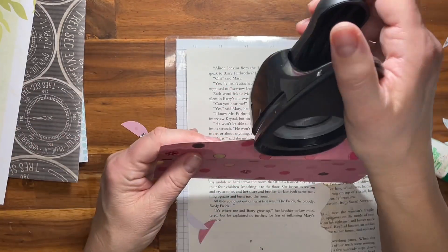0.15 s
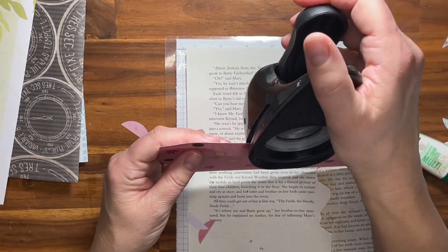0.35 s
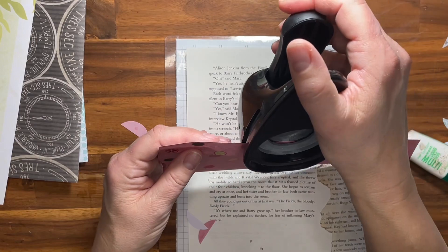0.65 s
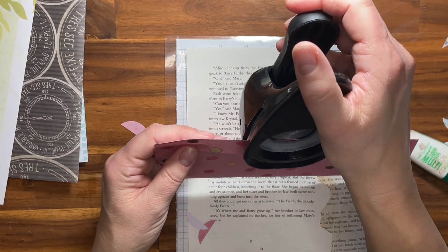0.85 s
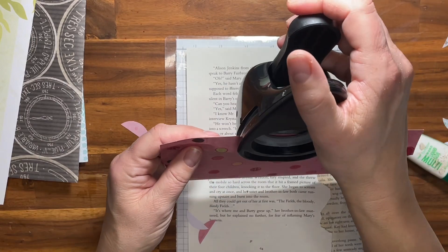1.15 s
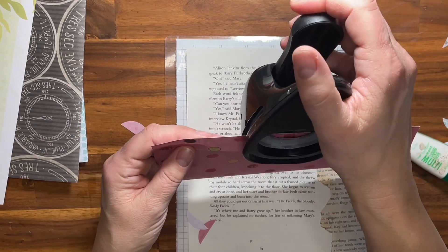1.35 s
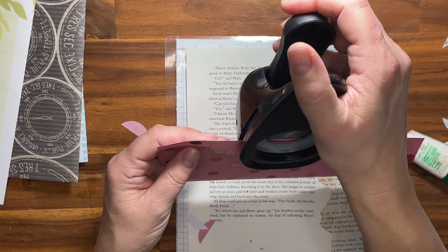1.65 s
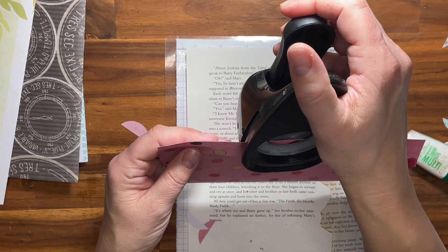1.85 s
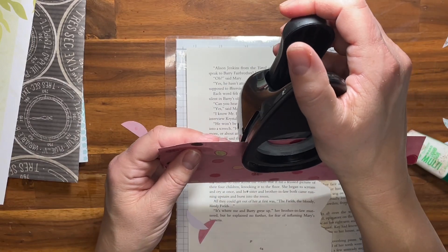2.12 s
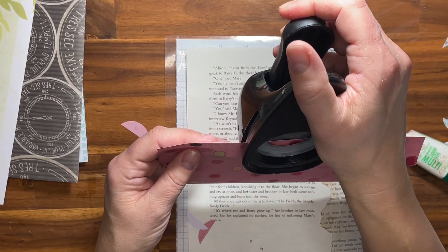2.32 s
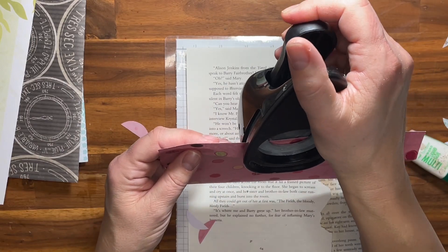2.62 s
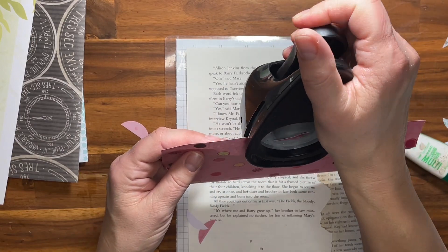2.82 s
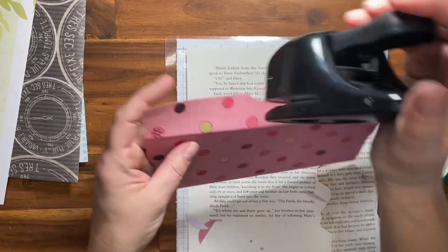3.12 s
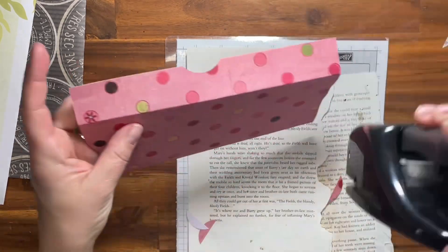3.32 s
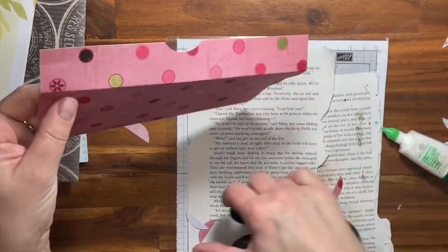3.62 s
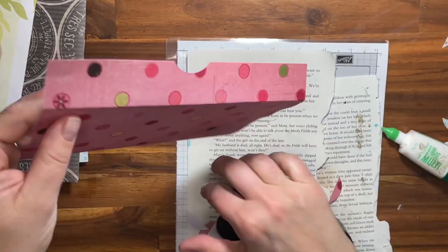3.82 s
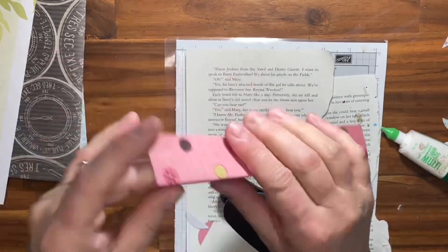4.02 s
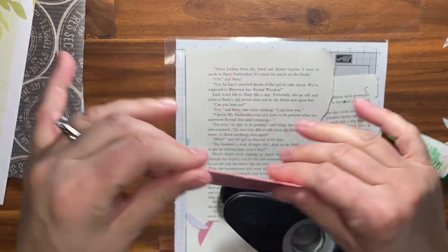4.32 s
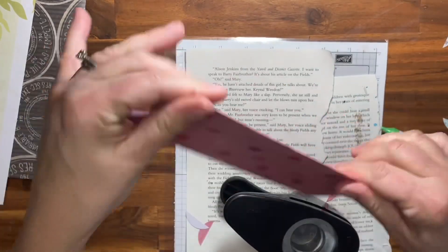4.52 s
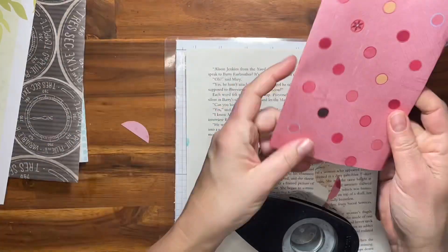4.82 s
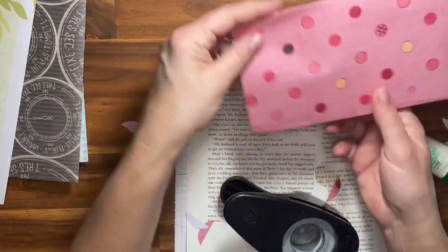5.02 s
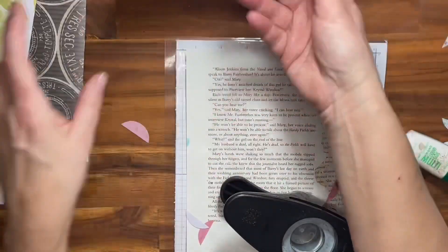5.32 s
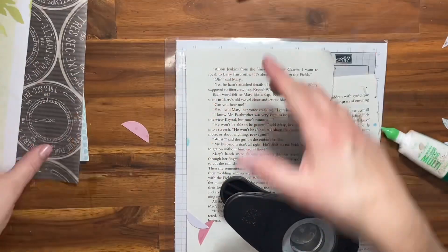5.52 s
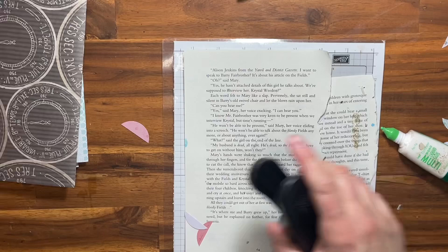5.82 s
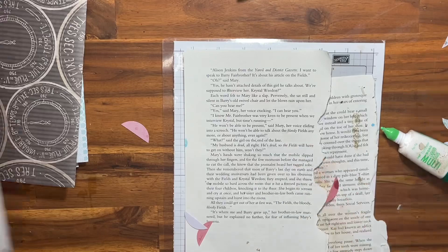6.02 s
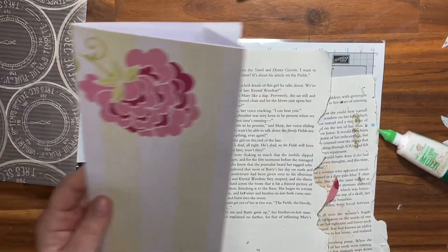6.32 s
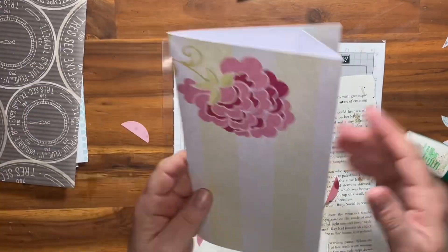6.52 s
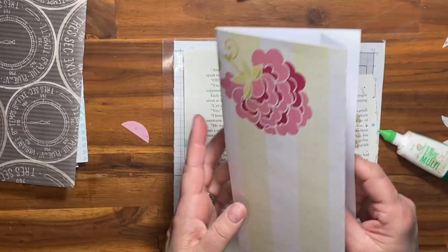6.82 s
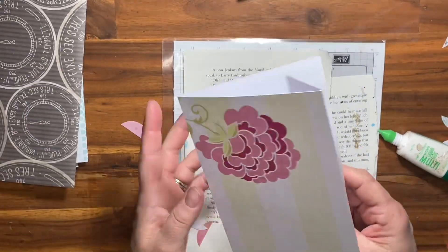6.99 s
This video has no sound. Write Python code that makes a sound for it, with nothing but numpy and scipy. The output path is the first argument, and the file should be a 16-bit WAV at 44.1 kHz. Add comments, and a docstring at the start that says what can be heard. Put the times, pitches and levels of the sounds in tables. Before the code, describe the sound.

Close up in a small room with a faint low ventilation rumble, card rubs faintly in the fingers. A plastic lever punch crunches through it with a dry crackle and clicks back, then lands on the wooden table in two loud hollow clacks. Brisk card rustles and snaps follow, one sharp, then a short grating shove and several woody bumps.

```python
"""In a small room with a low ventilation rumble, someone crafts at a wooden table.
Card slides through the fingers, as rough friction noise; soft contacts and snaps are short resonant bursts.
A plastic lever punch shears a notch out of a card, springs open and is set down with two hard knocks,
rung by the damped modes of its parts and of the table top. Then card is tapped and laid aside, the punch
is shoved, and hands and card bump the table. Two close ports hear it with unequal phase and level."""
import sys
import numpy as np
from scipy import signal
from scipy.fft import rfft, irfft, next_fast_len
from scipy.io import wavfile
from scipy.ndimage import uniform_filter1d, map_coordinates

SR = 44100
rng = np.random.default_rng(int(sys.argv[2]) if len(sys.argv) > 2 else 0)


def generate_wav(signal):
    """Clip the signal to [-1, 1] and save it as 16-bit WAV at the path in sys.argv[1]."""
    frames = np.transpose(np.atleast_2d(signal))
    scaled = np.clip(frames, -1, 1) * 32767
    pcm = np.round(scaled).astype(np.int16)
    wavfile.write(sys.argv[1], SR, pcm)


N = 315315

# the punch lands twice, rocking on its base: (time [s], clack level [dB], weight [dB],
# brightness [dB per octave], frequency at which the struck corner rings most [Hz])
PUNCH_LANDINGS = [(3.645, -7.5, -7.5, 1, 4150), (3.672, -21.5, -15.5, -1, 2200),
                  (3.8318, -20.5, -29, -2.5, 1550), (3.8505, -11.5, -7.5, 3, 5300),
                  (3.865, -15.5, -16.5, 1.5, 3200), (3.902, -23.5, -30, -3.5, 1610),
                  (3.910, -28, -29, 3, 1140), (3.921, -39, -21, -3, 1140)]
# modes of the punch's hollow body: (frequency [Hz], relative level [dB], t60 [s])
BODY_MODES = [(397, -3.5, 0.089), (440, 2, 0.04), (482, -3, .06), (555, -7, .06), (638, -3.5, 0.051),
              (703, -8, .05), (794, -5, .055), (886, -8, .03)]
# modes of the punch's steel die: (frequency [Hz], relative level [dB], t60 [s])
DIE_MODES = [(1110, -4, .3), (1120, -4, .4), (1146, -0.5, 0.48), (1183, 5, .14)]


def amp(db):
    """Level in decibels to amplitude ratio."""
    return 10 ** (np.asarray(db) / 20)


def unit(x):
    """Normalisation to an rms of 1."""
    return x / np.sqrt(np.mean(x ** 2) + 1e-20)


def along(points, hz):
    """Interpolation of (frequency [Hz], value) points on a logarithmic frequency axis."""
    f, v = np.transpose(points)
    return np.interp(np.log(hz + 1), np.log(f + 1), v)


def filtered(x, response):
    """Linear filtering: the spectrum of x times a response of frequency."""
    size = x.shape[-1]
    padded = next_fast_len(size + SR // 4)
    spectrum = rfft(x, padded) * response(np.fft.rfftfreq(padded, 1 / SR))
    return irfft(spectrum, padded)[..., :size]


def coloured(x, spectrum):
    """Spectral shaping of x, renormalised to an rms of 1."""
    return unit(filtered(x, lambda hz: amp(along(spectrum, hz))))


def wobble(rate):
    """Slow random modulation: a smooth curve through random knots, rate of them a second."""
    knots = rng.standard_normal(int(N * rate / SR) + 4)
    return map_coordinates(knots, [np.arange(N) * rate / SR])


def ring_time():
    """Time axis of the half second that follows a contact."""
    return np.arange(SR // 2) / SR


def fade(t60, attack):
    """Exponential decay of a damped system after a quick rise."""
    t = ring_time()
    return np.exp(-np.log(1000) * t / t60) * (1 - np.exp(-t / attack))


def ring(modes, attack, scatter_db):
    """Modal superposition: damped sines, each at a new random strength for every blow."""
    sound = np.zeros(SR // 2)
    for hz, db, t60 in modes:
        strength = amp(db + scatter_db * rng.standard_normal())
        sound += strength * fade(t60, attack) * np.sin(2 * np.pi * hz * ring_time())
    return sound


def burst(hz, t60, q, attack):
    """Resonance excited by a brief noisy force: a crunch heard through a broad band around one pitch."""
    force = fade(t60, attack) * (1 - np.exp(-ring_time() / attack))
    noise = force * rng.standard_normal(len(force))
    sound = filtered(noise, lambda f: 1 / (1 + 1j * q * (f / hz - hz / (f + 1))) ** 2)
    return sound * np.linalg.norm(force) / np.linalg.norm(sound)


def add(track, s, sound):
    """Superposition: mix a sound into the track at time s."""
    start = round(s * SR)
    track[start:start + len(sound)] += sound[:N - start]


def ventilation(rumble_db=-47.5, diffuse_db=-72):
    """Steady broadband noise: a coherent rumble at both ports under a little incoherent, diffuse air."""
    # rumble spectrum: (frequency [Hz], relative level [dB])
    air = [(20, -7.5), (35, -15), (54, 5.5), (80, -5.5), (100, -13), (120, 0), (145, -12), (175, -11),
           (280, -20.5), (420, -21), (1000, -27), (2500, -31.5), (6000, -47.5), (16000, -88)]
    air_above = [(100, -3), (500, 4), (2500, -7.0), (7000, -97), (16000, -50.0)]
    diffuse = np.array([coloured(rng.standard_normal(N), air_above) for _ in range(2)])
    return amp(rumble_db) * coloured(rng.standard_normal(N), air) + amp(diffuse_db) * diffuse


def room(x, early_db, tail_db, early_t60=0.027, apart_db=-2):
    """Reverberation: early reflections from close surfaces, then a partly incoherent tail at the ports."""
    # reverberation time: (frequency [Hz], t60 [s])
    decay_times = [(60, 1), (300, 0.44), (1200, 0.47), (4000, 0.36), (12000, 0.25)]
    hz, t, z = signal.stft(rng.standard_normal((3, SR // 2)), SR, nperseg=256)
    decay = np.exp(-np.log(1000) * t / along(decay_times, hz)[:, None])
    tails = signal.istft(z * decay, SR, nperseg=256)[1][:, :SR // 2]
    # one part of the tail is shared, the other differs from port to port
    tails = (tails[0] + amp(apart_db) * tails[1:]) * (1 - np.exp(-ring_time() / 0.0034))
    early = rng.standard_normal(SR // 2) * fade(early_t60, attack=0.0071)
    early = amp(early_db) * early / np.linalg.norm(early)
    answer = early + amp(tail_db) * tails / np.linalg.norm(tails[0])
    return x + signal.fftconvolve(x[None], answer, axes=1)[:, :N]


def sliding(pressure_weight, rise_share=0.34, fall_share=.35, resting_db=-78.5):
    """Sliding speed and pressure set friction strength: strokes speed up, hold and slow down, adding in power."""
    # strokes of card over skin, paper and wood:
    # (time [s], length [s], relative level [dB], pressure [dB], counted by pressure_weight)
    strokes = [(0.145, 0.38, -62, 1.5), (0.478, 0.19, -69.5, 2), (.74, 0.13, -69.5, 0),
               (0.874, 0.58, -68.5, 3), (1.37, 0.25, -72, 2), (2.042, 0.091, -75, 9),
               (2.643, 0.092, -56, 4), (2.66, 0.3, -58, 3.5), (2.846, 0.031, -47.5, 6.5),
               (2.87, 0.21, -61, -2), (2.967, 0.26, -63.5, 7.5), (3.308, 0.63, -72, 0),
               (3.406, 0.15, -60, -6), (3.979, 0.089, -60.5, 16), (3.966, 0.27, -57, 1.5),
               (4.235, 0.21, -50.5, -17.5), (4.488, 0.09, -53, -4.5), (4.589, 0.14, -55, -1),
               (4.675, 0.21, -58, -2), (4.821, 0.36, -55.5, -1), (5.1, 0.22, -70.5, -1),
               (5.225, 0.14, -61.5, -5), (5.347, 0.086, -48.5, 3.5), (5.432, 0.14, -49, 5),
               (5.517, 0.32, -51.5, 4.5), (5.681, 0.029, -44, 0), (5.711, 0.056, -53.5, 12),
               (5.743, 0.49, -57.5, -1.5), (6.126, 0.13, -55, 9.5), (6.18, 0.42, -61.5, 7.5),
               (6.529, 0.2, -55, 4.5), (6.713, 0.12, -55.5, 10.5), (6.78, 0.28, -72.5, 7),
               (6.9, 0.35, -64.5, 8.5)]
    t = np.arange(N) / SR
    power = np.full(N, amp(resting_db) ** 2)  # the card shifting in a still hand
    for s, length, db, pressure_db in strokes:
        u = t[:round(length * SR)] / length
        speed = np.clip(np.minimum(u / rise_share, (1 - u) / fall_share), 0, 1)
        add(power, s, (amp(db + pressure_weight * pressure_db) * speed) ** 2)
    return np.sqrt(power)


def friction(spectrum, catches_per_s, catch_db, patchy_db):
    """Stick-slip of fibres: a rush with tiny uneven catches, its colour shifting as the sheet bends."""
    catches = (rng.random(N) < catches_per_s / SR) * rng.uniform(-1.03, 1, N)
    rush = rng.standard_normal(N) + amp(catch_db) * unit(catches)
    z = signal.stft(rush, nperseg=512)[2]
    # random gains, smoothed over frequency and then over time
    patches = uniform_filter1d(rng.standard_normal(z.shape), size=5, axis=0)
    patches = uniform_filter1d(patches, size=9, axis=1)
    return coloured(signal.istft(z * amp(patchy_db * unit(patches)), nperseg=512)[1][:N], spectrum)


def crackles(per_s=40, centre_hz=2900, octaves=0.83, uneven_db=5.0, t60=0.018, q=1.1):
    """Random impulsive excitation: creases and edges catch, each with its own pitch and size; rms 1."""
    out, size = np.zeros(N), SR // 40
    envelope = fade(t60, attack=0.0013)[:size]
    for when, pitch, chance in rng.random((round(per_s * N / SR), 3)):
        hz = centre_hz * 2 ** (octaves * (2 * pitch - 1))
        resonance = signal.iirpeak(hz, q, fs=SR)
        grain = signal.lfilter(*resonance, envelope * rng.standard_normal(size))
        grain = signal.lfilter(*resonance, grain)
        add(out, when * N / SR, amp(-uneven_db * np.log(chance + 0.04)) * unit(grain))
    return unit(out)


def rustle(scrape_db=-2, hiss_db=0, fizz_db=-5, crackle_db=-8, grip_db=2.0, fizz_loss=0.38):
    """Friction noise under an unsteady grip: pressure brings out scrape and crackle, light strokes the fizz."""
    # spectra of the sheet's scrape, its hiss and its fibres' fizz: (frequency [Hz], relative level [dB])
    scrape_spectrum = [(150, -10), (400, 12.5), (700, 7.5), (1150, 9), (2000, 4), (3300, 7.5), (5000, -11),
                       (8000, -39), (16000, -49)]
    hiss_spectrum = [(1000, -12), (2500, -5), (4000, 1.5), (5500, 5), (7500, -7.5), (10500, -8),
                     (16000, -7.5)]
    fizz_spectrum = [(3000, -46), (6500, -73), (9000, 2.5), (11500, -1), (13500, -13), (16000, -0.5)]
    pressed = sliding(0.92)
    light = sliding(-fizz_loss)  # dB lost for each dB of pressure
    scrape = pressed * friction(scrape_spectrum, catches_per_s=250, catch_db=-2.0, patchy_db=2.5)
    hiss = sliding(0) * friction(hiss_spectrum, catches_per_s=500, catch_db=-16.0, patchy_db=2)
    fizz = light * friction(fizz_spectrum, catches_per_s=200, catch_db=-13.0, patchy_db=1)
    rubbing = amp(scrape_db) * scrape + amp(hiss_db) * hiss + amp(fizz_db) * fizz
    return amp(grip_db * wobble(60)) * rubbing + amp(crackle_db) * pressed * crackles()


def small_contacts(tick_db=4, edge_db=-14, edge_hz=5000, soft_hz=5500, soft_t60=0.058, snap_t60=0.017):
    """Contact hardness sets brightness: soft low contacts, crisp snaps, a spring's ping, a lever's click."""
    # soft low contacts: taps of fingers and card, the falling knock of board bumps,
    # the punch and a hand rubbing the table: (time [s], level [dB], pitch [Hz])
    soft_contacts = [(.818, -45, 836), (0.983, -43.5, 650), (1.145, -48.5, 1180), (1.801, -47.5, 884),
                     (2.698, -44.5, 1700), (2.857, -46, 1070), (2.995, -46, 1880), (3.012, -43.5, 1630),
                     (4.036, -41, 700), (4.253, -42.5, 1160), (4.557, -42, 880), (4.671, -36.5, 790),
                     (4.625, -46.5, 740), (5.035, -47, 875), (5.108, -47, 1110), (5.362, -38, 1430),
                     (5.412, -25, 1400), (5.419, -36, 650), (5.726, -35, 1300), (5.731, -38, 520),
                     (6.197, -34.5, 1100), (6.201, -30.5, 520), (6.325, -25, 1870), (6.333, -34, 850),
                     (6.633, -28.5, 1590), (6.641, -33, 960), (6.741, -32, 900), (6.754, -30.5, 1150),
                     (6.788, -49, 2120), (7.0605, -43.5, 1830)]
    # sharp snaps of card edges, cut fibres and the punch's lever: (time [s], level [dB], pitch [Hz])
    snaps = [(2.761, -39, 2800), (2.771, -38.5, 8000), (2.795, -34, 5000), (2.84, -31, 4000),
             (2.856, -26.5, 3300), (2.865, -28, 4000), (3.092, -34.5, 3000), (3.117, -35, 10800),
             (3.128, -33, 10900), (3.185, -41, 2800), (3.193, -39, 2500), (3.1995, -23, 4100),
             (3.993, -37, 4970), (4.09, -29, 1480), (4.122, -30, 4500), (4.132, -16.5, 3700),
             (4.215, -44, 6900), (4.6705, -28, 1750), (4.777, -27.5, 890), (5.123, -39, 8460),
             (5.349, -33.5, 3100), (5.41, -11.5, 1680), (5.4605, -25.5, 2210), (6.186, -34, 4930),
             (6.197, -26, 2000), (6.4112, -31, 1970), (6.984, -36, 1400), (7.059, -39, 5000)]
    # the punch's steel spring ticks as it is loaded: (time [s], level [dB])
    spring_ticks = [(2.4965, -43)]
    # the lever springs back against its stop: (time [s], level [dB])
    releases = [(3.2002, -21)]
    # modes of the spring and of the lever: (frequency [Hz], relative level [dB], t60 [s])
    spring_modes = [(1400, -3.5, 0.09), (2360, -3, .07), (2808, 6, 0.061), (3100, 0, .03), (3370, -2, .025),
                    (3640, -6, .05), (4421, -6, .06), (4720, -5, 0.14), (5118, -6, .11), (5450, -14, .085),
                    (5732, -12, 0.19), (6166, -12, 0.17), (6540, -9, .12)]
    lever_modes = [(1420, 1, .016), (1590, 0, .013), (1850, -7, .011), (2200, -3, 0.014), (2830, -3, .012),
                   (3600, -3, .013), (4150, -6, .012)]
    out = np.zeros(N)
    for s, db, hz in soft_contacts:
        add(out, s, amp(db) * burst(hz, soft_t60, q=1.0, attack=0.00068))
    # the soft contacts make little treble
    out = signal.sosfilt(signal.butter(2, soft_hz, fs=SR, output="sos"), out)
    for s, db, hz in snaps:
        edge = amp(edge_db) * burst(edge_hz, snap_t60, q=1.0, attack=0.0051)
        add(out, s, amp(db) * (burst(hz, snap_t60, q=0.72, attack=0.001) + edge))
    for s, db in spring_ticks:
        tick = amp(tick_db) * burst(hz=3100, t60=0.029, q=0.84, attack=0.0009)
        add(out, s, amp(db) * (ring(spring_modes, attack=0.0011, scatter_db=2.5) + tick))
    for s, db in releases:
        add(out, s, amp(db) * ring(lever_modes, attack=0.0009, scatter_db=2))
    return out


def slips(length, per_s, uneven_db):
    """Repeated hold and release at uneven moments and strengths: (delay [s], gain)."""
    count = round(length * per_s)
    chance = rng.random((count, 2))
    delays = (np.arange(count) + chance[:, 0]) * length / count
    return zip(delays, amp(uneven_db * (2 * chance[:, 1] - 1.5)))


def cutting(fibre_hz=4200, octaves=.8, fibre_t60=.009, fibre_db=12):
    """Fracture in small steps: fibres part under the die in a quick, dry crackle, each at its own pitch."""
    # the die shears through the card: (time [s], length [s], relative level [dB])
    cuts = [(2.666, .215, -51.5)]
    out = np.zeros(N)
    for s, length, db in cuts:
        for delay, gain in slips(length, per_s=65, uneven_db=5):
            hz = fibre_hz * 2 ** (octaves * rng.standard_normal())
            fibre = burst(hz, fibre_t60, q=.8, attack=0.00056)
            add(out, s + delay, amp(db + fibre_db) * gain * fibre)
    return out


def shoving(grate_hz=1900, octaves=.8, grate_db=4, judder_hz=130, judder_db=6, body_db=-14):
    """Stick-slip of the punch's base: each slip grates, sounds the hollow body and shakes the board."""
    # the punch is shoved aside over the table: (time [s], length [s], relative level [dB])
    shoves = [(5.635, .125, -44)]
    out = np.zeros(N)
    for s, length, db in shoves:
        for delay, gain in slips(length, per_s=69, uneven_db=7):
            hz = grate_hz * 2 ** (octaves * rng.standard_normal())
            grate = amp(grate_db) * burst(hz, t60=0.011, q=0.87, attack=0.00065)
            judder = amp(judder_db) * burst(judder_hz, t60=0.034, q=1.5, attack=.002)
            body = amp(body_db) * ring(BODY_MODES, attack=.001, scatter_db=2)
            add(out, s + delay, amp(db) * gain * (grate + judder + body))
    return out


def boom(modes, contact, travel, knock_db, knock_hz, lowest_hz):
    """Contact time limits bandwidth: one push rings knock and modes, a longer one only the lowest."""
    push = np.sin(np.pi * np.minimum(ring_time() / contact, 1))
    knock = amp(knock_db) * burst(knock_hz, t60=0.1, q=1.0, attack=0.00051)
    wood = ring(modes, attack=0.0003, scatter_db=2.0) + knock
    # dispersion: bending waves travel faster as the root of frequency, so the knock falls in pitch
    spread = lambda hz: np.exp(-4j * np.pi * travel * np.sqrt(100 * hz))
    sound = filtered(signal.fftconvolve(wood, push / push.sum()), spread)
    return signal.sosfilt(signal.butter(3, lowest_hz, "highpass", fs=SR, output="sos"), sound)


def table_thumps(punch_db=-4, shaken_die_db=-35, hardest_contact_s=0.00053, softening=0.57,
                 punch_travel_s=0.008, card_travel_s=0.0205):
    """Strike position selects plate modes: the punch lands near the edge, hands and card further in."""
    # modes of the table top: (frequency [Hz], relative level when struck at the edge [dB],
    # relative level when struck further in [dB], t60 [s])
    table_modes = [(56, -14, -5.5, 0.31), (76.4, -15, -17, 0.25), (96.5, -18, 1, 0.17),
                   (108.5, 5, -5, 0.16), (121, -12, -3, .14), (148, -2.5, 1.5, 0.095), (183, -6, -10, .11),
                   (228, -10, -12, .15), (400, -4, -9, 0.06), (557, -12, -8, .16)]
    # hands and card bump the table top: (time [s], level [dB], contact time [s])
    bumps = [(5.619, -30, 0.0055), (5.662, -36, 0.004), (6.192, -29.5, 0.0025), (6.328, -18.5, 0.0028),
             (6.362, -24, 0.0053), (6.632, -29.5, 0.0039), (6.658, -27, 0.0069), (7.054, -45.5, 0.0052)]
    out = np.zeros(N)
    edge = [(hz, db, t60) for hz, db, _, t60 in table_modes]
    inner = [(hz, db, t60) for hz, _, db, t60 in table_modes]
    # travel is the time that a 100 Hz bending wave needs
    for s, _, weight_db, _, _ in PUNCH_LANDINGS:
        contact = hardest_contact_s * amp(-softening * weight_db)  # lighter blows are softer
        thump = boom(edge, contact, punch_travel_s, knock_db=-5.0, knock_hz=557, lowest_hz=65.0)
        add(out, s, amp(weight_db + punch_db) * thump)
    for s, db, contact in bumps:
        thump = boom(inner, contact, card_travel_s, knock_db=-8.5, knock_hz=330, lowest_hz=46)
        add(out, s, amp(db) * thump)
        # the punch now stands on the board, and each bump shakes its die
        add(out, s, amp(db + shaken_die_db) * ring(DIE_MODES, attack=0.004, scatter_db=5))
    return out


def punch_knocks(shell_db=-12, body_db=-1.5, body_grows=1.25, crack_t60=0.038, pivot_hz=2000,
                 body_lag=0.00078, favour_db=8.5, favour_octaves=.16, die_s=3.902, die_db=-40.5):
    """Modal excitation by impact: plastic cracks, the corner favours shell modes, body and die ring."""
    # crack of the plastic: (frequency [Hz], relative level before the tilt of each landing [dB])
    clack_spectrum = [(150, -25), (500, -9), (1200, 7), (2600, 2), (4200, -5), (6000, -11.5), (8000, -28),
                      (11500, -21.5), (16000, -42)]
    # modes of the shell: (frequency [Hz], relative level before the corner's favour [dB], t60 [s])
    shell_modes = [(1060, -3, .035), (1132, -3, 0.044), (1350, -1, .035), (1503, -1, 0.038),
                   (1610, -8, .04), (1890, -9, .025), (2230, -5, .06), (2500, -5, 0.046), (2775, -3, 0.042),
                   (3130, -4, 0.034), (3310, -10, .035), (3820, -3, .016), (4170, -2, 0.019),
                   (5305, -7, 0.039)]
    out = np.zeros(N)
    for s, clack_db, weight_db, slope_db, corner_hz in PUNCH_LANDINGS:
        tilted = [(hz, db + slope_db * np.log2(hz / pivot_hz)) for hz, db in clack_spectrum]
        crack = coloured(rng.standard_normal(SR // 2), tilted) * fade(crack_t60, attack=0.00088)
        favoured = []
        for hz, db, t60 in shell_modes:
            distance = np.log2(hz / corner_hz) / favour_octaves
            favoured.append((hz, db + favour_db * np.exp(-distance ** 2), t60))
        shell = amp(shell_db) * ring(favoured, attack=0.00052, scatter_db=1.5)
        add(out, s, amp(clack_db) * (crack + shell))
        body = ring(BODY_MODES, attack=0.00061, scatter_db=1.0)
        # the body's level grows faster than the weight of the blow
        add(out, s + body_lag, amp(body_grows * weight_db + body_db) * body)
    # the steel die rings once, as the punch settles on its base
    add(out, die_s, amp(die_db) * ring(DIE_MODES, attack=0.0023, scatter_db=1))
    return out


def scene():
    """Direct-to-reverberant balance: what the hands hold is drier; the table's boom reaches both ports alike."""
    rubbing = room(rustle(), early_db=-15, tail_db=-18.5)
    contacts = room(small_contacts() + cutting(), early_db=-13.0, tail_db=-21.0)
    knocks = room(punch_knocks() + shoving(), early_db=-8.0, tail_db=-16.5)
    return ventilation() + rubbing + contacts + table_thumps() + knocks


def record(dry, top=1.0, top_hz=16000):
    """Phase and level differences between two ports, then soft saturation of peaks and a band limit."""
    # how far the left port leads the right: (frequency [Hz], phase [rad])
    lead = [(190, 0), (380, .2), (800, .45), (1600, .35), (2600, .85), (4200, .9), (5200, .1), (6300, 1.2),
            (7600, 3.14), (10600, 6.28), (12500, 7.5), (14100, 9.42), (16000, 10.8)]
    # level difference of the ports: (frequency [Hz], left minus right [dB])
    balance = [(200, 0), (380, 2), (700, 2.4), (1300, -.8), (2400, .2), (4400, 0)]
    # each port takes half of the difference
    half = lambda hz: amp(along(balance, hz) / 2) * np.exp(1j * along(lead, hz) / 2)
    pair = filtered(dry, lambda hz: np.array([half(hz), 1 / half(hz)]))
    rounded = pair / (1 + np.abs(pair / top) ** 6) ** (1 / 6)
    return filtered(rounded, lambda hz: hz < top_hz)


dry = scene()
out = record(dry)
generate_wav(out)
```